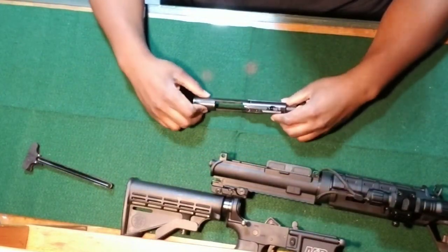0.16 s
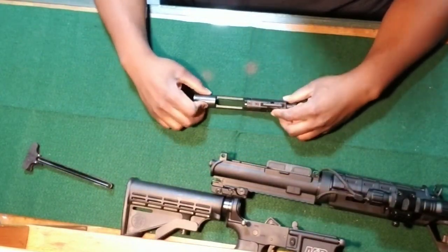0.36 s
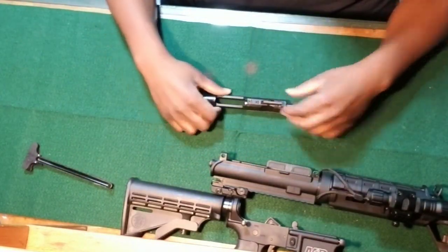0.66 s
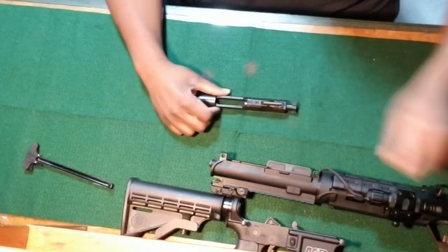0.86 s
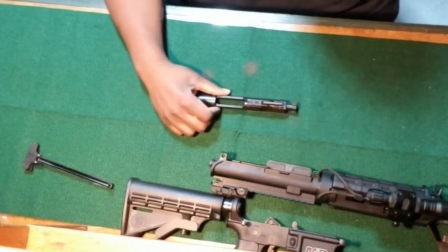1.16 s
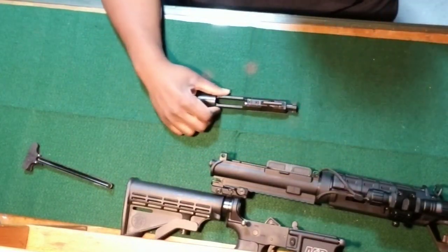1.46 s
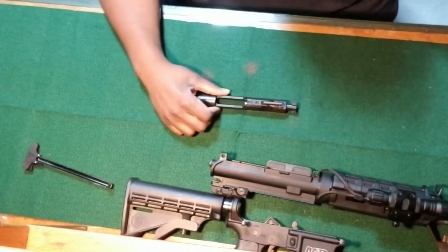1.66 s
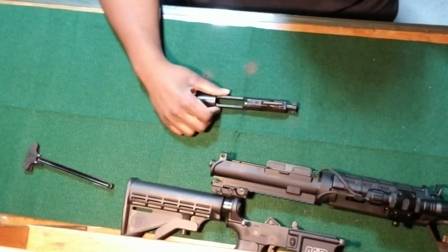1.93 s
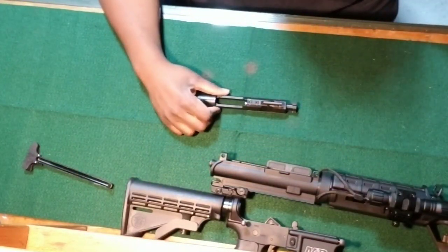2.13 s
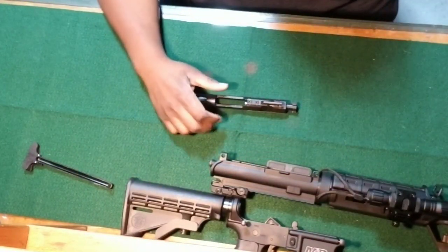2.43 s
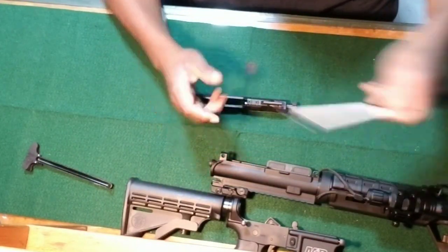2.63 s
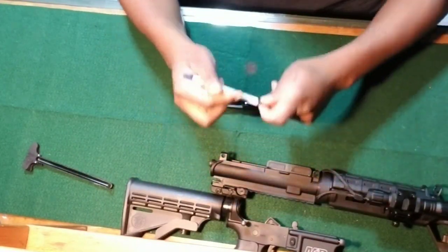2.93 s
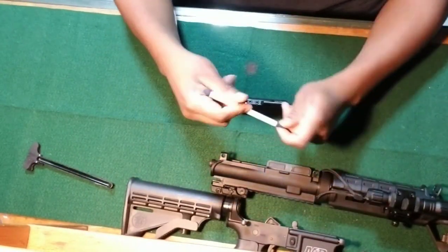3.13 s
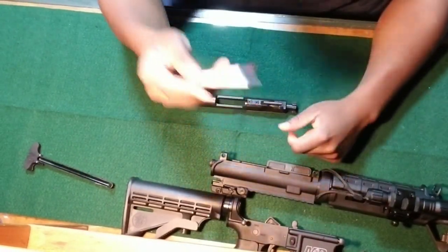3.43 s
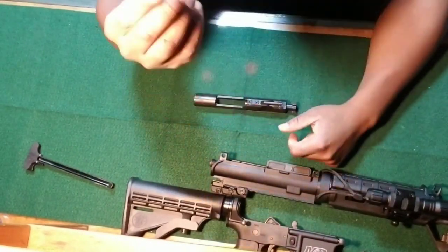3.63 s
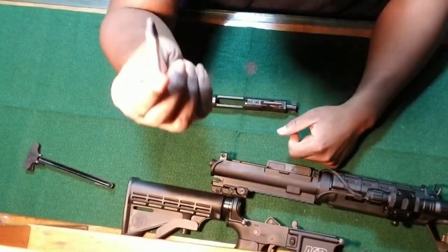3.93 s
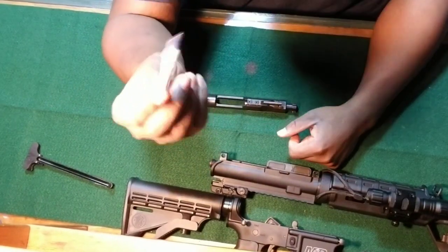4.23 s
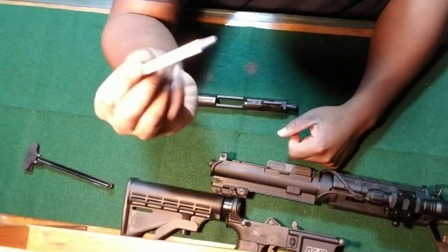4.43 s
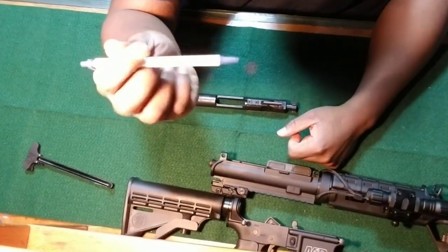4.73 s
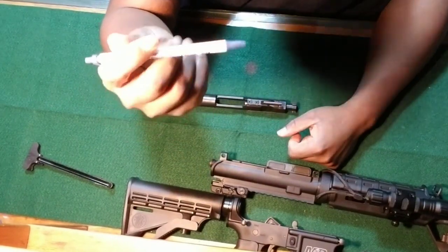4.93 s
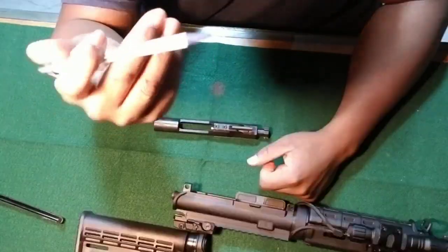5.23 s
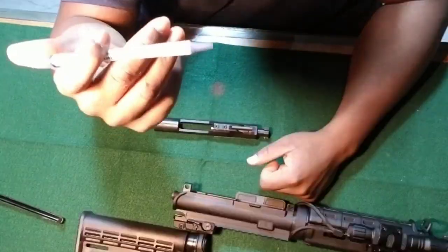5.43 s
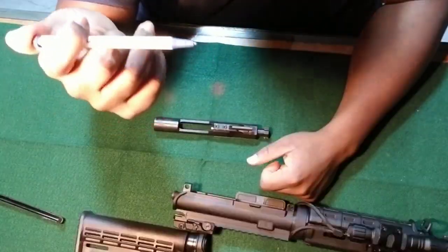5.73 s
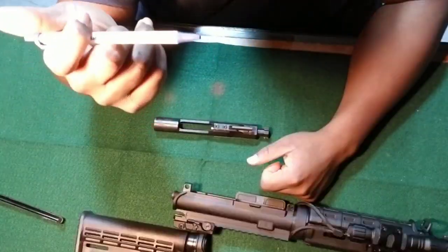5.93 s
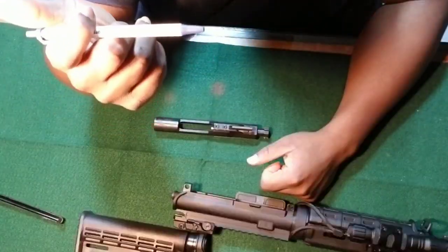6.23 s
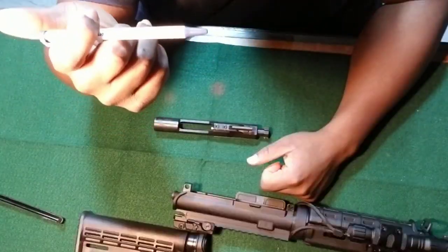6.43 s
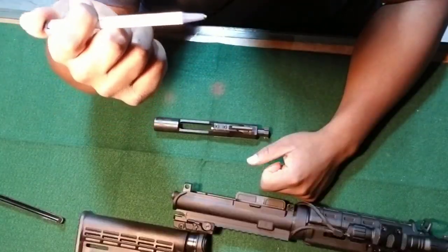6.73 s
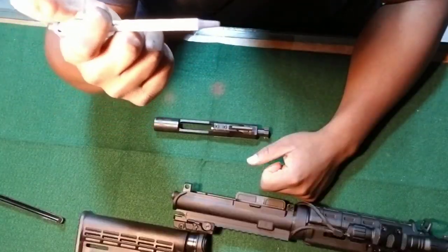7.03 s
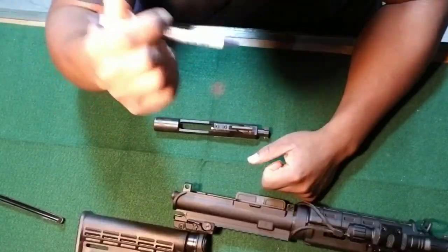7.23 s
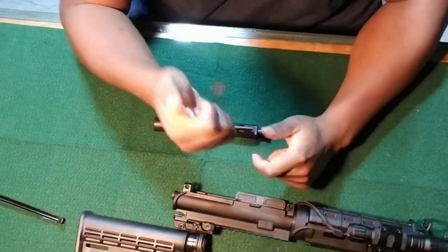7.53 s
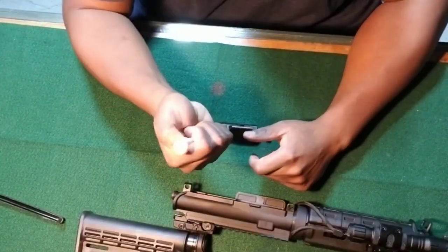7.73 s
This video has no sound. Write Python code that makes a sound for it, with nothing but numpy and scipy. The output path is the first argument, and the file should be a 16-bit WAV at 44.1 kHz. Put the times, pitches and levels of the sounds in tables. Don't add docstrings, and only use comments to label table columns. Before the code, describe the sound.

Close stereo pickup in a room with short reflections: steady soft hum and whine underneath. First a hollow box of small hard odds and ends is knocked and rubbed in a quick irregular burst, with a few sharp ticks. Then a long quiet gap, a small dull pop, a plastic pen clicked in and out with a springy snap, and finally its tip ticking once against steel.

```python
import sys
import numpy as np
from scipy import signal
from scipy.fft import rfft, irfft, next_fast_len
from scipy.io import wavfile
from scipy.ndimage import uniform_filter1d

SR = 44100
rng = np.random.default_rng(int(sys.argv[2]) if len(sys.argv) > 2 else 0)


def gain_from_db(level_db):
    decades = np.asarray(level_db, float) / 20
    return 10 ** decades


def wav_record(signal):
    frames = np.transpose(np.atleast_2d(signal))
    bounded = np.clip(frames, -1, 1)
    quanta = np.round(bounded * 32767).astype(np.int16)
    wavfile.write(sys.argv[1], SR, quanta)


N = 346934

# t/s, level/dB
HUM_SWELL = [(0.1, -39), (0.16, -40), (3.06, -42), (7.34, -39.5), (7.75, -40.5)]
# width/Hz, level/dB, left minus right/dB
WHINE_HZ = [118.6, 296, 4980, 5530, 5960, 6155, 6460, 6643, 6698, 6762, 6850, 7058, 7176, 8253, 8710]
WHINE_TONES = [(3.5, -70.5, 2), (8.4, -72, -1), (16.5, -70, 5.5), (47.5, -73.5, -5), (34.5, -72.5, -5.5),
               (32, -74, -15), (29, -90, -14), (18, -95, 18), (13.7, -87, -11), (18, -71.5, -10),
               (34.5, -58.5, -6), (24.5, -104, 8), (25.1, -90.5, 9), (25.1, -78.5, 17.5), (25, -90.5, 12)]
# f/Hz, level per Hz/dB
RUMBLE = [(20, -7.5), (45, 3), (90, -4.5), (200, -6.5), (320, -10.5), (420, -21), (850, -30), (1250, -32),
          (1700, -31), (2500, -32)]
HISS = [(1180, -88), (2000, -27.5), (3170, -21.5), (3580, -10.5), (4690, -13.5), (4860, -10.5), (6360, -8),
        (6640, -0.5), (7060, -6.5), (7510, -8.5), (9250, -15), (12500, -12.5), (16000, -18)]
# f/Hz, likeness (-1 to 1)
LIKENESS = [(60, 1), (130, 0.75), (290, 0.52), (640, .09), (1400, -0.12), (3000, -0.023)]
# f/Hz, left minus right/dB
LEAN = [(60, 6), (110, -4), (200, -2), (380, -2.5), (700, -6), (1290, 3.5), (2380, 2.5), (4400, -5.5),
        (8120, -8), (15000, -2)]
# f/Hz, time to fade by 60 dB/s, echo level/dB
ROOM = [(247, 0.42, 2.5), (1020, 0.23, 2), (4000, 0.066, 8), (8000, 0.063, 10.5), (16000, 0.16, 0.5)]
# t/s, peak level/dB, bright part minus peak/dB
KNOCKS = [(0.823, -59.5, -9), (1.242, -46.5, -10), (1.277, -45, -27), (1.351, -51, -20), (1.378, -45, -3.5),
          (1.408, -53, -4), (1.431, -45, -33), (1.521, -69, -21), (1.546, -57, -21), (1.684, -40.5, -33),
          (1.702, -38, -27), (1.721, -28, -11), (1.729, -40, -3), (1.754, -35, -19), (1.765, -22.5, -7),
          (1.772, -32.5, -6), (1.814, -29.5, -12.5), (1.843, -36.5, -21), (2.053, -38, -1),
          (2.089, -41, -11), (2.122, -50, -7), (2.149, -48.5, -4), (2.207, -43, -3), (2.243, -44.5, -9),
          (2.258, -44.5, 1.5), (2.299, -46.5, 10.5), (2.336, -52, 5), (2.399, -43, 2.5)]
# t/s of full pressure, held/s, level/dB, hardness (0 dull lining to 1 thin edge)
STROKES = [(0.845, 0.0099, -57, 0.42), (1.251, 0.036, -48, 0.3), (1.376, 0.053, -47.5, 0.18),
           (1.52, 0.025, -59.5, 0.046), (1.712, 0.054, -45.5, 0.37), (1.758, 0.008, -33, 0.33),
           (1.815, .03, -49, 0.45), (1.93, .08, -63.5, .05), (2.058, 0.013, -41, 0.36),
           (2.11, 0.22, -48.5, 0.41), (2.305, 0.0044, -46, 0.5), (2.34, 0.032, -46, 0.44),
           (2.391, 0.01, -46.5, 0.97), (2.615, 0.045, -68, 1), (2.72, 0.0067, -56, 0.39),
           (2.82, 0.079, -66, 1), (3.70, 0.012, -63, 0.38)]
# f/Hz, level/dB, time to fade by 60 dB/s
BOX = [(296, -13, .04), (481, 0, 0.044), (576, -5.5, 0.047), (717, -8, 0.039), (794, 3.5, 0.035),
       (964, -23, .03), (1136, -10, 0.06)]
CONTENTS = [(1400, -9, .012), (1840, -2, .025), (2148, 0, .015), (2735, 0, .012), (3494, -6, .01),
            (4000, -7, .01), (4700, -8, .008), (5600, -12, .006)]
# f/Hz, level/dB, time to fade by 60 dB/s
LINING = [(326, -1.5, 0.013), (540, 4.5, 0.016), (663, 4.5, 0.011), (725, -1, 0.035), (1030, 8.5, 0.0015)]
CLUTTER = [(1250, 6, 0.018), (1500, 9, 0.02), (1620, 8, 0.0089), (1880, 0, 0.06), (2150, -14, .012),
           (2400, 11, 0.0042)]
HARDWARE = [(2450, 4, 0.0023), (3230, -11.5, 0.015), (3450, -2.5, 0.0036), (4340, -6.5, 0.013),
            (5830, 8, 0.0013)]
THIN_EDGES = [(6000, -35, 0.0026), (7500, -6, .003), (10400, -10, 0.0043), (14000, -7, 0.0019)]
# t/s, peak level/dB, treble minus peak/dB, left minus right/dB, chatter length/s
CLICKS = [(1.723, -40, -1, 2, 0.0019), (1.8133, -32.5, -2, -1, 0.00078), (2.2995, -53, -8, 14, 0.0012),
          (2.3972, -29, 2, -1, 0.0034), (2.404, -42, -15, 18, 0.0051), (2.559, -48, -12, -3, 0.0049),
          (2.8215, -54, 8.5, 0, 0.0065), (2.855, -45, -3, -1, 0.003), (5.6277, -31.5, 1.5, 1.5, 0.0024),
          (5.7828, -44, -8, -4, 0.00042), (5.858, -50, 0, -3, .002), (6.6112, -26.5, -4, -3, 0.00028),
          (6.614, -50, 5, -1, .003), (6.631, -42, -10, 2, .001), (6.851, -35, 3, 11, 0.0015),
          (6.8585, -44, 5, 22, 0.0012), (6.8612, -21, 2, -6.5, 0.00022), (6.864, -35, -3, 3, 0.0024)]
BUTTON_OUT = [
    (5.8038, -31, 4.5, 3.5, .0012),
    (5.8056, -25, 6.3, 1.4, 0.002),
]
TAP = [
    (7.6655, -29.5, 1, 0, 0.00025),
    (7.668, -66, 5.7, 0, 0.0025),
]
# f/Hz, level/dB, time to fade by 60 dB/s
BARREL = [(594, -30, 0.0052), (2780, -10, 0.0035), (3780, -5, 0.0086), (4180, 4, 0.0031),
          (4600, -5.5, 0.0033)]
RATCHET = [(5700, -3, .003), (6400, -3, .003), (6900, 0, .004), (7500, -7, .003)]
TREBLE = [(9000, -6, .002), (10100, -3, .002), (11400, 0, .002), (12700, 0, .002), (14000, -5, .002),
          (15400, -7, .002)]
SPRING = [(9500, -8, .002), (11400, -4, .002), (12700, -2, .002), (14000, 0, .002), (15400, -2, .002)]
STEEL = [(2550, -25, 0.0034), (3670, -13, .006), (4690, 1, 0.0047), (5500, 5.5, 0.0036)]


def rms_one(x):
    return x / np.sqrt(np.mean(x ** 2) + 1e-20)


def at_hz(points, hz):
    table = np.array(points)
    return np.interp(np.log(hz), np.log(table[:, 0]), table[:, 1])


def place(pair, pan_db, lead):
    left = pair[0] * gain_from_db(pan_db / 2)
    right = np.roll(pair[1], lead) * gain_from_db(-pan_db / 2)
    return np.array([left, right])


def ring(blows, modes, spread_db=0):
    out = 0
    favour_db = spread_db * rng.standard_normal(len(modes))
    for k, (hz, level_db, fade_s) in enumerate(modes):
        r = gain_from_db(-60 / (fade_s * SR))
        w = 2 * np.pi * hz / SR
        gain = (-1) ** k * gain_from_db(level_db + favour_db[k])
        out = out + signal.lfilter([0, gain * np.sin(w)], [1, -2 * r * np.cos(w), r * r], blows + 1e-18)
    return out


def chatter(length_s, draw):
    t = np.arange(draw.shape[-1]) / SR
    build = 1 - np.exp(-t / 0.00017)
    fade = np.exp(-t / np.clip(length_s, 0.0003, 0.01))
    return build * fade * draw * np.abs(draw)


def coloured_noise(spectrum):
    size = next_fast_len(N)
    hz = np.maximum(np.arange(size // 2 + 1) * SR / size, 1)
    sides = np.array([[1], [-1]])
    mid, side = rfft(rng.standard_normal((2, size)))
    alike = np.clip(at_hz(LIKENESS, hz), -1, 1)
    pair = np.sqrt(1 + alike) * mid + np.sqrt(1 - alike) * side * sides
    inside = (hz >= spectrum[0][0]) & (hz <= min(spectrum[-1][0], 15900))
    gain = gain_from_db(at_hz(spectrum, hz) + at_hz(LEAN, hz) / 2 * sides) * inside
    return rms_one(irfft(pair * gain, size)[:, :N])


def hum():
    t = np.arange(N) / SR
    turn = 2 * np.pi * 59.29 * t
    flutter = rms_one(uniform_filter1d(uniform_filter1d(rng.standard_normal(N), size=900), size=900))
    swell_db = np.interp(t, *np.transpose(HUM_SWELL))
    first = gain_from_db(swell_db + 0.48 * flutter) * np.sqrt(2)
    beat = 0.61 * np.sin(3 * turn + 2 * np.pi * (t - 1.54) / 2.454)
    third = gain_from_db(-61 - 0.9 * t) * np.sqrt(2) * (np.sin(3 * turn) + beat)
    skew = -0.12
    return np.array([first * np.sin(turn + skew) + third, first * np.sin(turn - skew) + third])


def whine():
    out = np.zeros((2, N))
    white = rng.standard_normal((2, N))
    white[0] += 0.11 * white[1]
    for hz, (width_hz, level_db, pan_db) in zip(WHINE_HZ, WHINE_TONES):
        r = np.exp(-np.pi * width_hz / SR)
        section = [1, 0, -1, 1, -2 * r * np.cos(2 * np.pi * hz / SR), r * r]
        left, right = signal.sosfilt([section, section], white)
        if hz < 1000:
            left = right
        side_db = np.array([[pan_db / 2], [-pan_db / 2]])
        out += gain_from_db(level_db + side_db) * [rms_one(left), rms_one(right)]
    return out


def room(pair):
    t = np.arange(SR // 2) / SR
    white = rng.standard_normal((2, len(t)))
    table = np.array(ROOM)
    echo = 0
    for hz in 250 * 2.0 ** np.arange(7):
        edges = [hz / np.sqrt(2), min(hz * np.sqrt(2), 0.45 * SR)]
        band = signal.butter(2, edges, "band", fs=SR, output="sos")
        fading_db = at_hz(table[:, ::2], hz) - 60 * t / at_hz(table, hz)
        echo = echo + signal.sosfilt(band, white) * gain_from_db(fading_db)
    echo = echo * (1 - np.exp(-(t / 0.003) ** 2)) / np.sqrt(len(t))
    return signal.fftconvolve(pair, echo, axes=1)[:, :N]


def pop():
    t = (np.arange(N) / SR - 5.15425) / 0.00017
    push = np.exp(-t ** 10)
    dip = 0.8 * np.exp(-(4 * (t + 1.25)) ** 2)
    return gain_from_db(-39.5) * (push - dip)


def rub(modes, hardness, level_db):
    slips = (rng.random(N) < 2000 / SR) * gain_from_db(3.5 * np.minimum(rng.exponential(1, N), 4))
    shared, own = slips * rng.standard_normal((2, N))
    stroke = np.zeros(N)
    for s, held_s, db, hard in STROKES:
        span = slice(round((s - 0.15) * SR), round((s + held_s + 0.3) * SR))
        t = np.arange(span.start, span.stop) / SR - s
        loss_db = 504 * np.maximum(-t, 0) + 319 * np.maximum(t - held_s, 0)
        mismatch_db = 95.5 * (hard - hardness) ** 2
        stroke[span] += gain_from_db(db + level_db - mismatch_db - loss_db)
    return stroke * rms_one(ring(shared + 0.51 * own * [[1], [-1]], modes))


def knock():
    out = np.zeros((2, N))
    for (s, peak_db, bright_db), draw in zip(KNOCKS, rng.standard_normal((len(KNOCKS), 3, 4000))):
        thud = ring(chatter(0.004, draw[0]), BOX, spread_db=3)
        uneven = draw[1] + 0.7 * draw[2] * [[1], [-1]]
        crack = ring(chatter(0.0035, uneven), CONTENTS, spread_db=3)
        both = gain_from_db(-0.5) * thud / np.abs(thud).max() + gain_from_db(bright_db + 5.5) * crack / np.abs(crack).max()
        start = round(s * SR)
        out[:, start:start + draw.shape[1]] += gain_from_db(peak_db) * both
    return out


def rummage():
    rubs = rub(LINING, 0.1, level_db=1.0) + rub(CLUTTER, 0.23, level_db=-12)
    rubs = rubs + rub(HARDWARE, 0.77, level_db=7.0) + rub(THIN_EDGES, 0.96, level_db=3.0)
    return knock() + gain_from_db(-4) * rubs


def click(events, body, treble, body_db):
    out = np.zeros((2, N))
    for event, draw in zip(events, rng.standard_normal((len(events), 2, 1500))):
        s, peak_db, treble_db, pan_db, length_s = event
        blow = chatter(length_s, draw[0] + 0.5 * draw[1] * [[1], [-1]])
        parts = [ring(blow, modes) for modes in (RATCHET, body, treble)]
        levels_db = 0, body_db - (1 - 0.38) * (peak_db + 35), treble_db
        sound = sum(gain_from_db(db) * part / np.abs(part).max() for db, part in zip(levels_db, parts))
        start = round(s * SR)
        out[:, start:start + draw.shape[1]] += gain_from_db(peak_db) * place(sound, pan_db, lead=7)
    return out


def pen():
    clicking = click(CLICKS, BARREL, TREBLE, body_db=-11)
    springing = click(BUTTON_OUT, BARREL, SPRING, body_db=-1.5)
    tapping = click(TAP, STEEL, TREBLE, body_db=13)
    return clicking + springing + tapping


def scene():
    floor = gain_from_db(-58.5) * coloured_noise(RUMBLE) + gain_from_db(-57) * coloured_noise(HISS)
    box = place(rummage(), pan_db=-1.0, lead=13)
    near = pen()
    tails = room(gain_from_db(7) * box + gain_from_db(14.5) * near)
    return hum() + whine() + floor + box + near + pop() + tails


def roll_off(x):
    return signal.sosfilt(signal.butter(12, 16640, fs=SR, output="sos"), x)


def record(dry):
    top_cut = signal.cheby2(12, 60, 16700, fs=SR, output="sos")
    mix = signal.sosfilt(top_cut, dry)
    return roll_off(mix)


dry = scene()
out = record(dry)
wav_record(out)
```